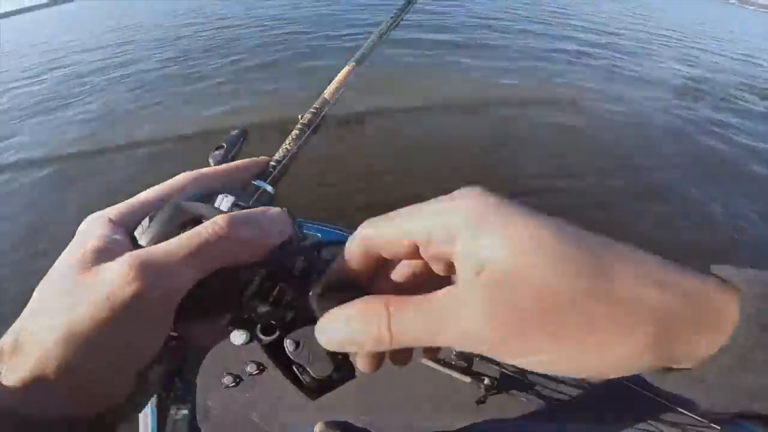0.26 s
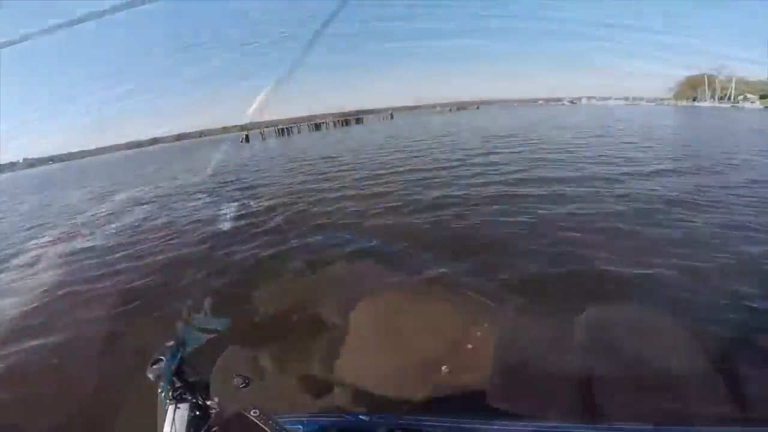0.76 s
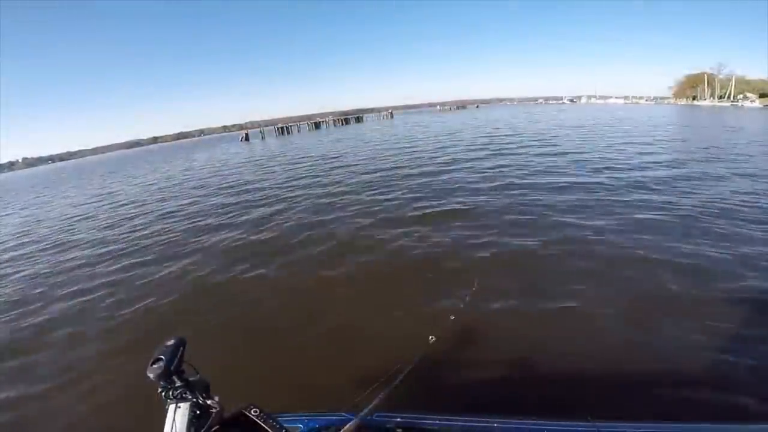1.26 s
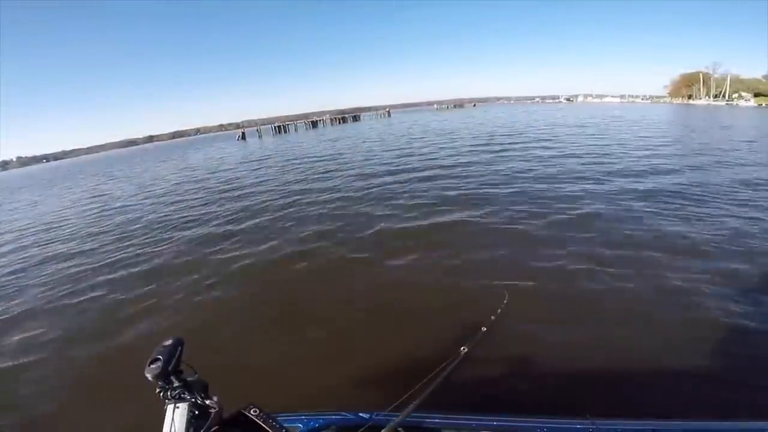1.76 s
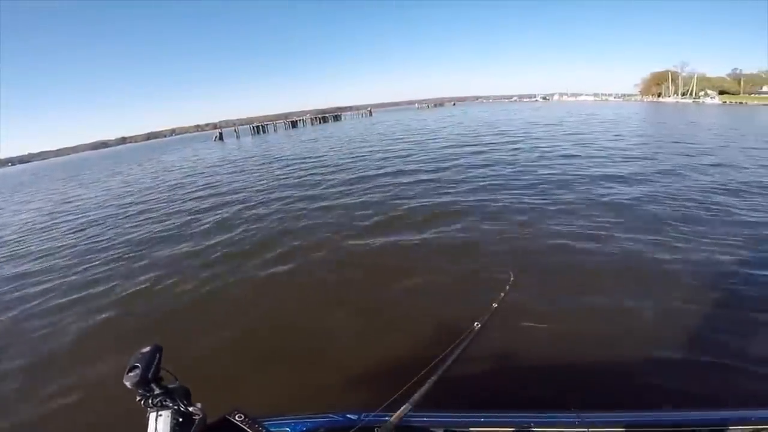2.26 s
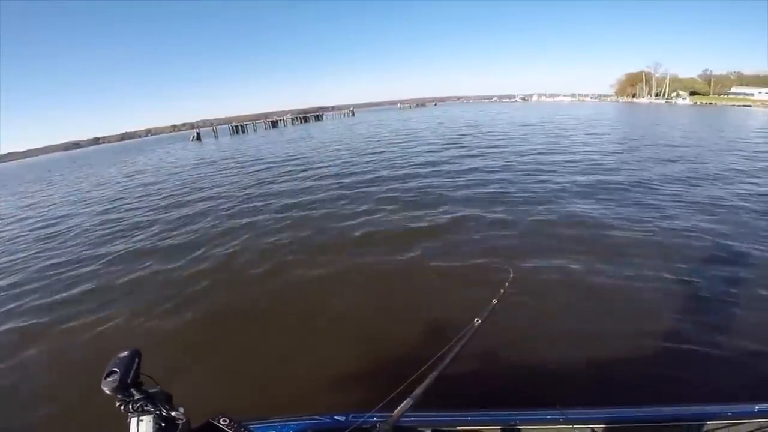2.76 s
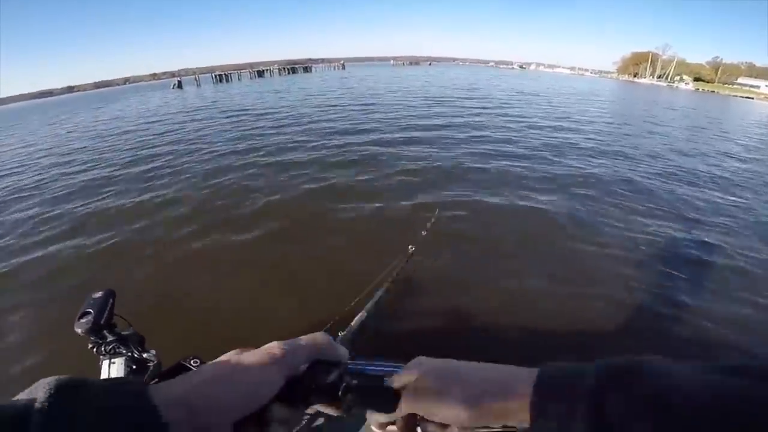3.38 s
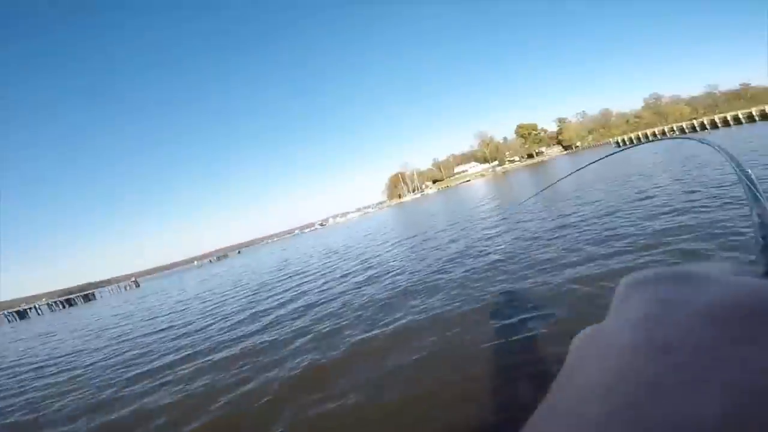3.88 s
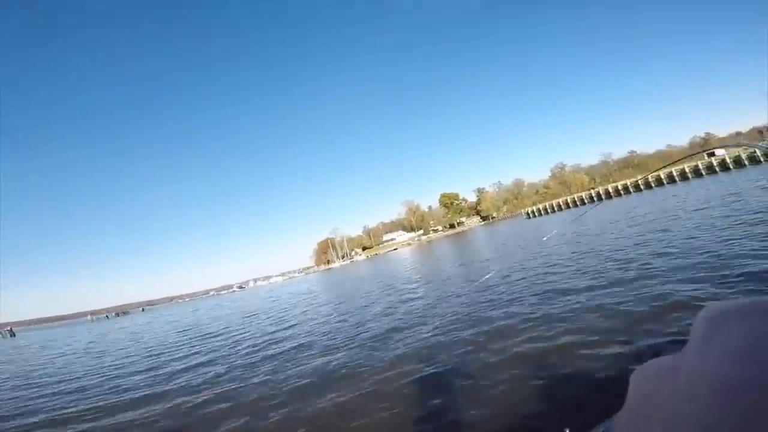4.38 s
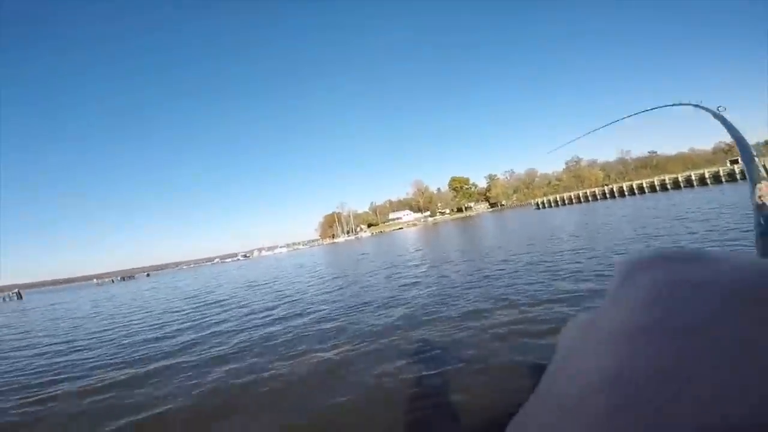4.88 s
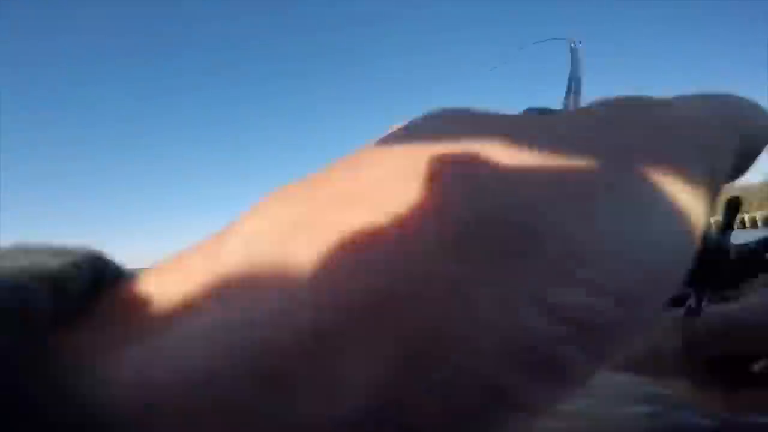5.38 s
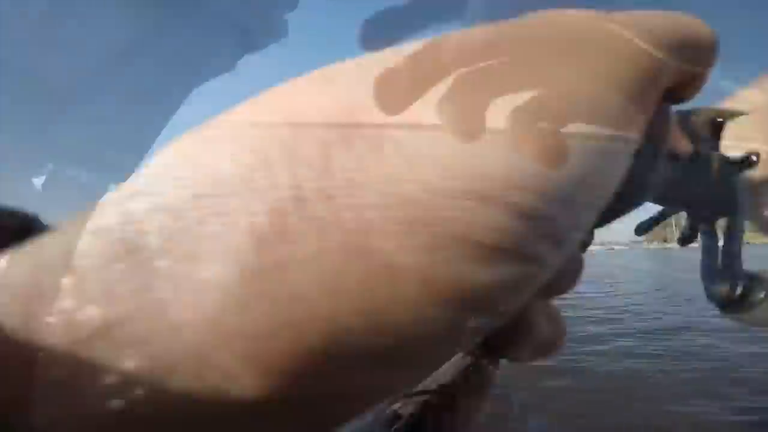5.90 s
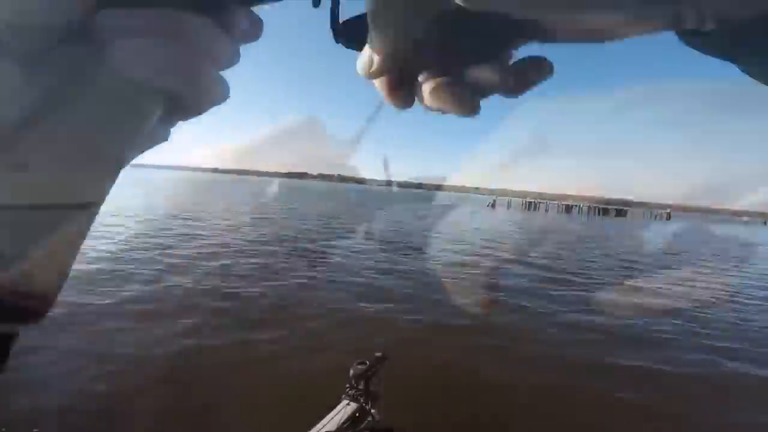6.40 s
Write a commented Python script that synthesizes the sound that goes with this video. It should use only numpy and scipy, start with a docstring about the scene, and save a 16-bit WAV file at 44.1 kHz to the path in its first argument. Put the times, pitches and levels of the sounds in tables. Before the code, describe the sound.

Slack line ticks softly into a hand-cranked reel, then mostly water lapping at the hull with small bubbles and a low breeze. A sudden rod sweep brings sleeve rustle, woody creaks and dull thumps. The boat rocks gently, then dry metallic ratchet bursts, bright snaps and gritty winding dominate, very near the microphone outdoors, with low wind buffeting.

```python
"""Slack line ticks lightly into a hand-cranked fishing reel, over wind and water lapping at a boat's hull.
The angler sweeps the rod back to set the hook: the sleeve swishes, the tackle creaks, the rod butt thumps.
Then line slips against the drag in spurts and the clicker rattles loudly while the winding goes on.
Clicks are noise bursts shaped by the reel's modes; rubbing, cloth, water and air are coloured noise;
thumps, jolts and bubbles are damped sines, and the gears whine in harmonics."""
import sys
import numpy as np
from scipy import signal
from scipy.fft import rfft, irfft, next_fast_len
from scipy.io import wavfile
from scipy.ndimage import uniform_filter1d

SR = 44100
rng = np.random.default_rng(int(sys.argv[2]) if len(sys.argv) > 2 else 0)


def transcribe(signal):
    """Save signal, clipped to [-1, 1], as a 16-bit WAV file at the path in sys.argv[1]."""
    frames = np.atleast_2d(signal).T
    limited = np.clip(frames, -1, 1)
    pcm = np.round(limited * 32767).astype(np.int16)
    wavfile.write(sys.argv[1], SR, pcm)


N = 293165
TIME = np.arange(N) / SR
EDGE_HZ = 15500  # upper limit of the band
# times at which the reel is held out, raised and overhead: [t/s]
POSE_TIMES = [3.92, 6.23, 6.92]


def amp(db):
    """Amplitude ratio: 20 dB is a factor of ten."""
    return 10 ** (np.asarray(db) / 20)


def unit(x):
    """Normalization to unit rms."""
    return x / np.sqrt(np.mean(x ** 2) + 1e-20)


def follow(rows):
    """Envelope interpolated in decibels along rows (t/s, level/dB), decaying exponentially outside them."""
    s, db = np.transpose(rows)
    outside = np.maximum(np.maximum(s[0] - TIME, TIME - s[-1]), 0)
    return amp(np.interp(TIME, s, db)) * np.exp(-outside / 0.019)


def swells(rows):
    """Incoherent sum of Gaussian envelopes, rows (peak t/s, rise/s, fall/s, level/dB): powers add."""
    edge_db = 7.5  # loss one rise before the peak or one fall after it
    power = np.zeros(N)
    for s, rise, fall, db in rows:
        away = (TIME - s) / np.where(TIME < s, rise, fall)
        power += amp(db - edge_db * np.minimum(away ** 2, 20)) ** 2
    return np.sqrt(power)


def add(mix, s, sound):
    """Linear superposition of a sound starting at time s."""
    part = mix[max(round(s * SR), 0):][:len(sound)]
    part += sound[:len(part)]


def colour(x, spectrum):
    """Linear filtering by a gain curve of rows (f/Hz, level/dB), interpolated in log frequency, to rms 1."""
    hz, db = np.transpose(spectrum)
    size = next_fast_len(N)
    gain = amp(np.interp(np.log(np.fft.rfftfreq(size, 1 / SR) + 1), np.log(hz), db))
    return unit(irfft(rfft(x, size) * gain, size)[:N])


def drift(hz):
    """Random fluctuation: Gaussian low-pass noise of unit rms."""
    lowpass = np.exp(-(np.fft.rfftfreq(N, 1 / SR) / hz) ** 2)
    return unit(irfft(rfft(rng.standard_normal(N)) * lowpass, N))


def rings(rows, glide, attack, size=8000):
    """Damped oscillation, rows (t/s, level/dB, initial f/Hz, decay/s); the pitch glides as it dies."""
    out, t = np.zeros(N), np.arange(size) / SR
    for s, db, hz, decay in rows:
        pitch = hz * (1 + glide * (1 - np.exp(-t / decay / 2)))
        turns = np.cumsum(pitch) / SR
        envelope = np.exp(-t / decay) * (1 - np.exp(-t / attack))
        add(out, s, amp(db) * np.sin(2 * np.pi * turns) * envelope)
    return out


def grains(per_s, spread_db, decay, size=400):
    """Poisson-like impacts of very uneven size, each an exponentially decaying noise burst."""
    sizes = amp(spread_db * np.minimum(rng.exponential(1, N), 3))
    hits = (rng.random(N) < per_s / SR) * sizes
    envelope = np.convolve(hits, np.exp(-np.arange(size) / SR / decay))[:N]
    return envelope * rng.standard_normal(N)


def clicker(uneven=.1, vary_db=2.0, bright_vary_db=3.5):
    """Ratchet kinematics: one pawl drop per tooth, giving rows (t/s, level/dB, brightness/dB)."""
    # spurts of line slipping against the drag:
    # [t/s, length/s, teeth passed, level/dB, brightness/dB, lean (+ gathers speed, - runs down)]
    spurts = [(4.674, .0165, 3, -9.5, -1, .2), (4.715, .026, 3, -9.5, 3, 0), (4.820, .010, 2, -10, .5, 0),
              (4.871, .0095, 2, -11, .5, 0), (4.908, .009, 2, -11, -1.5, 0),
              (4.9305, .0613, 13, -12.5, -5, -.17), (5.0086, .019, 3, -15.5, 0, 0),
              (5.084, .010, 2, -13.5, 0, 0), (5.1205, .0077, 2, -12, -1, 0),
              (5.1455, .065, 14, -12.5, -2, -.29), (5.232, .010, 2, -17, 2, 0), (5.295, 0, 1, -9.5, 1, 0),
              (5.3777, .0227, 5, -13, 0, -.2), (5.519, .094, 16, -13.5, 1.5, 0),
              (5.716, .0637, 12, -12.5, 1.5, .4), (5.7997, .0093, 2, -16, 1.5, 0),
              (5.8344, 0, 1, -13.5, -2, 0), (5.8573, .013, 3, -14, 0, -.25), (5.891, .017, 7, -15, 1.5, .3),
              (5.914, .052, 22, -14.5, 2.5, 0), (5.9694, .016, 3, -21.5, 2, -.3),
              (6.078, .062, 11, -19.5, 0, .55), (6.160, 0, 1, -21, -2, 0), (6.237, .0167, 3, -23, -3, -.45),
              (6.266, .0454, 9, -21.5, -2, 0), (6.352, .0196, 3, -11, -3, 0),
              (6.3956, .0135, 3, -13, 1, -.45), (6.5543, .011, 2, -10.5, -2, 0),
              (6.5914, .0207, 4, -12, -3, 0), (6.6343, .0055, 2, -12, 1, 0)]
    surge = .26  # shortening of the tooth interval in mid-spurt, as a share of the mean
    bite_db, first_db = 0.5, -2.5  # mid-spurt level above the ends; change for the slow first tooth
    clicks = []
    for s, length, teeth, db, bright_db, lean in spurts:
        turned = np.linspace(0, 1, max(round(teeth), 1))
        late, harder, sharper = rng.standard_normal((len(turned), 3)).T
        arch = np.sin(np.pi * turned)
        at = turned + lean * turned * (1 - turned)
        at = at + surge * np.sin(2 * np.pi * turned) / (2 * np.pi)
        at = at + uneven * arch * late / len(turned)
        level = db + bite_db * (arch - arch.mean()) + first_db * (turned == 0) + vary_db * harder
        clicks.append(np.c_[s + length * at, level, bright_db + bright_vary_db * sharper])
    return np.concatenate(clicks)


def reel_body(s, bright_db, hz, vary_db=4.0, wander=0.013, valley_db=-23):
    """Modal radiation: a minimum-phase response whose modes each click excites a little differently."""
    # resonances of the reel as it nears the microphone:
    # [f/Hz, half-width/Hz at -8 dB, level/dB held out, level/dB raised, level/dB overhead]
    modes = [(402, 165, 6.5, -3, 1), (730, 208, 11.5, 3, -31), (1664, 570, 0.5, 2, -1.5),
             (2226, 680, -0.5, -2.5, -5.5), (2940, 620, 9.5, -7.5, -5), (3800, 290, -10, -8, -50),
             (5070, 1030, -7, -15, -40), (6110, 306, 12.5, -7, -3), (6700, 2800, -16, -8, -16.5),
             (8070, 600, -3, -1, -8), (9200, 50, -9, -14.5, -13), (9790, 1260, -0.5, -12, -20),
             (13100, 1500, -8, -17.5, -23), (14700, 1100, -7, -10, -28)]
    power = amp(valley_db) ** 2
    for (centre, width, *poses), (louder, higher) in zip(modes, rng.standard_normal((len(modes), 2))):
        gain = amp(np.interp(s, POSE_TIMES, poses) + vary_db * louder)
        detuning = (hz - centre * (1 + wander * higher)) / width
        power = power + gain ** 2 / (1 + detuning ** 2 * 1.51) ** 2
    bass_loss = hz ** 2 / (hz ** 2 + 260 ** 2)  # a small body radiates little bass
    tilt = amp(bright_db * .5 * np.tanh((hz - 4500) / 1800))  # a sharper click carries more treble
    gain = np.sqrt(power) * bass_loss * tilt / (1 + (hz / EDGE_HZ) ** 20)
    # the Hilbert transform of the log gain supplies the phase of a causal response
    log_gain = np.log(np.maximum(gain, 1e-3))
    return np.exp(np.conj(signal.hilbert(np.r_[log_gain, log_gain[-2:0:-1]]))[:len(hz)])


def click_radiation(clicks, size=4096):
    """Impact and multiple scattering: each drop rings the frame; nearby arms and rod scatter it."""
    rise, decay, tail_decay = 0.00085, 0.0013, 0.01  # s
    fresh, tail_db, tail_hz = 0.64, -13, 2600  # share of new paths; scatter level and low-pass corner
    lead = .0013  # s by which the burst starts ahead of the click time
    margin = size // 8 / SR  # room ahead of the burst for the filtering
    t, hz = np.maximum(np.arange(size) / SR - margin, 0), np.fft.rfftfreq(size, 1 / SR)
    out = np.zeros(N)
    burst = np.minimum(t / rise, 1) * np.exp(-np.maximum(t - rise, 0) / decay)
    scatter = (1 - np.exp(-t / rise)) ** 2 * np.exp(-t / tail_decay)
    # neighbouring clicks take nearly the same paths, which change as the hands move
    path_times = np.linspace(clicks[:, 0].min(), clicks[:, 0].max(), 10)
    paths = rng.standard_normal((len(path_times), 2, size))
    for s, db, bright_db in clicks:
        shared = unit(np.tensordot(np.exp(-((s - path_times) / 0.13) ** 2), paths, 1))
        z = rfft((shared + fresh * rng.standard_normal((2, size))) * [burst, scatter])
        # the paths smear time and leave the colour to the body
        z /= np.sqrt(uniform_filter1d(abs(z) ** 2, size=91, axis=1) + 1e-12)
        both = z[0] + amp(tail_db) * z[1] / (1 + 1j * hz / tail_hz)
        click = irfft(both * reel_body(s, bright_db, hz))
        shift = rng.uniform(-.00005, .00005)  # s of small random shift in each click's time
        energy = np.sum(click ** 2) / (0.0028 * SR)  # as if spread over 2.8 ms
        add(out, s + shift - lead - margin, amp(db) * click / np.sqrt(energy))
    return out


def jolts(clicks, hz=150, decay=0.0048, spread=0.498):
    """Structure-borne transmission: each click also travels down the arm as a small dull push."""
    # level of the push relative to its click in each pose: [level/dB]
    jolt_db = [-14, -12, -24]
    s, db, _ = np.transpose(clicks)
    pitch = hz * np.exp(spread * rng.standard_normal(len(s)))
    level = db + np.interp(s, POSE_TIMES, jolt_db)
    return rings(np.c_[s, level, pitch, np.full(len(s), decay)], glide=-0.79, attack=0.00075)


def gears(tooth_hz=165, grit_db=1.1, tooth_db=2):
    """Amplitude-modulated friction: meshing teeth rub in quick uneven pulses, as hard as the hand winds."""
    # pushes on the handle, one list per spell of winding: [peak t/s, rise/s, fall/s, level/dB]
    winding = [
        [(0.34, .36, .34, -54.5), (.73, .05, .08, -63)],
        [(3.32, 0.18, 0.18, -48.5)],
        [(4.28, 0.082, 0.033, -50.5), (4.49, 0.086, 0.066, -51)],
        [(4.92, 0.21, 0.36, -41), (5.25, 0.34, 0.28, -42.5), (5.45, 0.21, 0.065, -37.5), (5.75, 0.16, .24, -36),
         (6.36, .15, 0.11, -36.5), (6.56, 0.06, .15, -37.5)],
    ]
    # relative spectrum of the gears' whirr in each spell: [f/Hz, level/dB]
    whirrs = [
        [(200, -23), (600, 4), (1400, 1.5), (2200, -4.5), (2900, -15), (5000, -21), (9500, -19.5), (12000, -29),
         (15000, -26)],
        [(400, -1), (1300, -11), (2150, -0.5), (3000, -12.5), (4000, -20.5), (4600, -19), (5800, -19),
         (7500, -23), (8200, -21), (8900, -26), (9900, -16.5), (11200, -33), (15000, -30)],
        [(300, 6), (900, 4), (1700, -2), (3000, -2), (4000, -18), (5800, -11), (6600, -19), (9500, -17),
         (11000, -29), (15000, -26)],
        [(300, 0), (700, -0.5), (1100, 0), (1850, 1), (2600, -2.5), (4200, -14), (6100, -13.5), (7000, -20),
         (9000, -13), (10500, -22), (12500, -28), (14500, -21)],
    ]
    passed = np.cumsum(tooth_hz * (1 + .15 * drift(7.67))) / SR
    teeth = .28 + np.exp(-(passed % 1) / .25)
    worn = rng.standard_normal(N)[np.abs(passed).astype(int)]  # no two teeth bite alike
    rub = rng.standard_normal(N) * teeth * amp(tooth_db * worn + grit_db * drift(250))
    return sum(colour(rub, whirr) * swells(pushes) for whirr, pushes in zip(whirrs, winding))


def gear_whine(waver=0.0149, count=8):
    """Harmonic synthesis: harmonics 2 to 7 of the tooth mesh arch with the speed of the handle."""
    # one quick turn of the handle: [t/s, mesh f/Hz, level/dB]
    quick_turn = [(4.21, 399, -74), (4.245, 457, -60), (4.28, 494, -60), (4.305, 475, -63),
                  (4.33, 410, -77)]
    s, hz, db = np.transpose(quick_turn)
    turns = np.cumsum(np.interp(TIME, s, hz) * (1 + waver * drift(164))) / SR
    mesh = sum(np.sin(2 * np.pi * k * turns) for k in range(2, count))
    return unit(mesh) * follow(np.c_[s, db])


def spool(waver=.035, width_hz=300):
    """Friction-driven resonance: narrow-band noise on a wavering carrier, the loaded spool singing."""
    # resonance of the spool under load: [t/s, f/Hz, level/dB]
    singing = [(5.278, 2050, -56), (5.42, 1834, -42.5), (5.66, 1850, -43), (6.031, 1817, -49),
               (6.2, 1826, -48), (6.33, 1965, -43), (6.459, 1826, -40), (6.65, 1758, -45)]
    s, hz, db = np.transpose(singing)
    pitch = np.interp(TIME, s, hz) * (1 + waver * drift(20.96))
    carrier = np.exp(2j * np.pi * np.cumsum(pitch) / SR)
    rubbing = drift(width_hz) + 1j * drift(width_hz)
    return unit((carrier * rubbing).real) * follow(np.c_[s, db])


def slack_ticks(ticks_per_s=105, decay=0.00063, size=300):
    """Impulsive excitation: light ticks ring the high resonances of the reel as slack comes in."""
    # swells of the ticking, as gain: [peak t/s, rise/s, fall/s, level/dB]
    ticking = [(.13, 0.26, 0.04, -51.5), (.22, 0.036, 0.036, -46.5), (.35, .08, .085, -45),
               (.57, 0.071, 0.16, -54)]
    out, t = np.zeros(N), np.arange(size) / SR
    teeth = np.cumsum(ticks_per_s * (1 + 0.09 * drift(8))) / SR
    for s in TIME[1:][np.diff(np.floor(teeth)) > 0]:
        tick = rng.standard_normal(size) * np.exp(-t / decay)
        add(out, s, amp(2 * rng.standard_normal()) * tick)
    modes = [(3770, 420, 6.4), (6070, 290, 13.7), (7900, 260, 7.0)]  # f/Hz, width/Hz, gain/dB
    rung = sum(amp(db) * signal.lfilter(*signal.iirpeak(hz, hz / width, SR), out)
               for hz, width, db in modes)
    return rung * swells(ticking)


def line_crackle():
    """Stick-slip: tight turns of line slip over each other in sparse bursts."""
    # line wound on tight: [peak t/s, rise/s, fall/s, level/dB]
    strain = [(4.79, .025, .04, -54), (5.46, 0.081, .12, -42.5), (5.78, 0.12, 0.14, -41),
              (6.1, 0.14, 0.098, -51.5), (6.58, .08, 0.18, -44.5)]
    # relative spectrum of the crackle: [f/Hz, level/dB]
    crackle = [(1000, -10), (3000, -12), (6000, -5), (9000, 1), (11300, 1), (12700, -11), (14500, 3),
               (16000, -9)]
    slips = grains(per_s=240, spread_db=3.5, decay=0.0012)
    return colour(slips, crackle) * swells(strain)


def sleeve(grain_db=4):
    """Sliding friction: randomly modulated noise, the cloth catching and sliding during the sweep."""
    # strokes of the sleeve: [peak t/s, rise/s, fall/s, level/dB]
    strokes = [(3.63, 0.045, 0.036, -42.5), (3.70, .02, 0.035, -30.5), (3.81, 0.067, 0.045, -46.5),
               (3.99, 0.044, 0.063, -60)]
    # relative spectrum of the cloth: [f/Hz, level/dB]
    cloth = [(300, 13.5), (900, 5), (1500, 1), (2200, 6.5), (2800, -1), (3600, -6), (5000, -9), (6100, -12),
             (7000, -11), (8000, -3), (9200, 2), (10300, -14), (12500, -21), (14400, -15)]
    return colour(rng.standard_normal(N) * amp(grain_db * drift(230)), cloth) * swells(strokes)


def creaks(snap_trim_db=-6, sharpness=7, snap_hz=9500, decay=.0008, size=900):
    """Stick-slip: each short slip of the loaded tackle gives a snap and a damped resonance."""
    # creaks and ticks: [t/s, ring peak level/dB, f/Hz, snap level/dB re ring before the trim]
    slips = [(.732, -49, 4240, -2), (1.999, -47, 2600, -16), (3.406, -35, 5100, -25),
             (3.623, -23, 2120, -18), (3.633, -31.5, 3700, -10), (3.651, -22.5, 1980, -28),
             (3.688, -21, 13000, -8), (3.695, -12.5, 3620, -11), (3.702, -16, 2330, -5),
             (3.711, -19, 1830, -26), (3.715, -19, 2010, -29), (3.726, -20, 2500, -22),
             (3.784, -36.5, 2880, 6), (3.815, -27, 2480, 2.5), (4.501, -38.5, 8200, 12),
             (4.619, -45, 6000, 11), (5.266, -16, 11800, 0), (5.4255, -19, 11800, 5),
             (5.463, -21, 12400, -11), (5.644, -10.5, 10200, -9), (5.824, -20, 10930, 5)]
    out, t = np.zeros(N), np.arange(size) / SR
    for s, db, hz, snap_db in slips:
        slip = rng.standard_normal(size) * np.exp(-t / decay)
        ring = signal.lfilter(*signal.iirpeak(hz, sharpness, SR), slip)
        snap = signal.lfilter(*signal.butter(2, snap_hz, fs=SR), slip)
        snap_gain = amp(snap_db + snap_trim_db)
        add(out, s, amp(db) * (ring / abs(ring).max() + snap_gain * snap / abs(snap).max()))
    return out


def thumps():
    """Damped free vibration: blows through the rod and the body, sinking slightly in pitch."""
    # blows: [t/s, level/dB before damping, initial f/Hz, decay/s]
    blows = [(.134, -18, 260, 0.0018), (.140, -19.5, 107, 0.015), (2.012, -27.5, 132, 0.013),
             (2.18, -28, 129, 0.018), (3.553, -32.5, 197, 0.023), (3.694, -10, 78.5, 0.0073),
             (3.726, -7.5, 120, 0.0029), (3.8125, -5.5, 605, 0.00098), (3.814, -18, 200, 0.0097),
             (3.818, -9, 74, 0.0051), (4.075, -33.5, 135.3, 0.016), (4.831, -19.5, 106, .012)]
    return rings(blows, glide=-0.038, attack=0.0004)


def water(wash_db=6.0, swell_db=3.0, ripple_db=-59, hiss_db=-73, count=220):
    """Turbulence and bubble resonance: waves wash the hull and shed bubbles, over a faint even hiss."""
    # relative spectrum of the wash: [f/Hz, level/dB]
    wash_spectrum = [(53, -14), (90, -7.5), (132, -3.5), (221, -8.5), (292, -6.5), (420, -9), (488, -14),
                     (645, -17), (948, -25.5), (1550, -35), (1690, -36), (3980, -43.5), (15000, -48)]
    # course of the lapping before the wash gain: [t/s, level/dB]
    lapping = [(0, -48), (.64, -57.5), (1.14, -55), (2.15, -54), (3.05, -52), (3.8, -57), (4.6, -58.5),
               (5.9, -49.5)]
    # slosh as the boat rocks after the sweep: [peak t/s, rise/s, fall/s, level/dB]
    rocking = [(3.91, 0.4, 0.19, -50.5), (4.32, 0.33, 0.81, -52.5)]
    # relative spectrum of the slosh: [f/Hz, level/dB]
    slosh_spectrum = [(200, -13), (450, 7), (900, 2), (1500, -8.5), (2500, -14.5), (5000, -23),
                      (12000, -31)]
    # two faint high squeaks, then the louder drips and bubbles at the hull:
    # [t/s, level/dB before damping, initial f/Hz, decay/s]
    squeaks_and_drips = [(1.015, -57, 4670, .0041), (1.055, -58, 3650, .0044), (1.113, -45, 1540, 0.0024),
                         (1.999, -43.5, 1740, 0.0039), (2.168, -37.5, 894, .0038), (2.237, -37, 477, 0.03),
                         (2.72, -38.5, 281, 0.032), (2.955, -44.5, 1350, 0.0044),
                         (3.889, -37.5, 1400, 0.003), (4.238, -37.5, 380, 0.018)]
    low = signal.lfilter(*signal.butter(2, 900, fs=SR), rng.standard_normal(N))
    waves = rng.standard_normal(N) + .5 * low * amp(swell_db * drift(10))
    wash = colour(waves, wash_spectrum) * follow(lapping)
    slosh = colour(rng.standard_normal(N) * amp(3.5 * drift(40)), slosh_spectrum) * swells(rocking)
    when, size, pitch = rng.random((count, 3)).T
    hz = 450 * 7 ** pitch
    # higher bubbles tend to be weaker and die sooner
    ripples = np.c_[when * TIME[-1], ripple_db + 13 * size ** 2 - 11 * pitch, hz, 5 / hz]
    bubbles = rings(ripples, glide=0.2, attack=0.0006)
    drips = rings(squeaks_and_drips, glide=0.073, attack=0.00012)
    return amp(wash_db) * wash + slosh + bubbles + drips + amp(hiss_db) * rng.standard_normal(N)


def spatter(level_db=-69):
    """Random impacts: ripples break against the hull in faint ticks."""
    # relative spectrum of the ticks: [f/Hz, level/dB]
    tick_spectrum = [(300, 2), (900, -14.5), (1700, -3), (2800, -14), (5000, -23), (14000, -40)]
    ticks = grains(per_s=24, spread_db=2.2, decay=.0025)
    return amp(level_db) * colour(ticks, tick_spectrum)


def wind(deep_from_db=-33):
    """Turbulent pressure: light air buffets the microphone, more deeply in strong pushes."""
    # relative spectrum of the light air: [f/Hz, level/dB]
    air = [(8, 4.5), (25, 1), (40, -6.5), (70, -6.5), (120, -21), (250, -28), (600, -65), (2000, -100)]
    # deep buffeting as the body moves, with a dull rubbing near 130 Hz: [f/Hz, level/dB]
    movement = [(6, -2.5), (18, -0.5), (28, 0.5), (45, -18), (70, -29), (130, -21.5), (300, -47.5),
                (2000, -110)]
    # swells of the buffeting, by gusts and as the angler moves: [peak t/s, rise/s, fall/s, level/dB]
    puffs = [(.08, .2, .25, -34), (1.08, .04, .06, -34), (2.16, .03, .04, -35), (3.11, .06, .1, -37),
             (3.61, .04, .03, -23), (3.72, .025, .04, -14.5), (3.81, .04, .06, -25), (4.15, .25, .2, -36),
             (4.95, .25, .5, -24), (5.8, .35, .22, -25), (6.5, .4, .5, -37)]
    breeze_db, gustiness_db, gust_hz = -39.5, 4, 1.3  # level, variation and its speed
    buffets = np.array([colour(rng.standard_normal(N), spectrum) for spectrum in (air, movement)])
    # even out the buffets so that the push sets the level
    light, deep = buffets / np.sqrt(uniform_filter1d(buffets ** 2, size=6000, axis=1) + 0.022)
    push = np.hypot(amp(breeze_db + gustiness_db * drift(gust_hz)), swells(puffs))
    share = 1 / (1 + (push / amp(deep_from_db)) ** 2)  # power share of the light air
    return push * (np.sqrt(share) * light + np.sqrt(1 - share) * deep)


def scene():
    """Superposition of reel, angler, water and wind at one microphone in open air."""
    clicks = clicker()
    reel = click_radiation(clicks) + jolts(clicks)
    reel = reel + gears() + gear_whine() + spool() + slack_ticks() + line_crackle()
    angler = sleeve() + creaks() + thumps()
    return (reel + angler + water() + spatter() + wind())[None]


def record(dry):
    """Saturation and band limitation: peaks are rounded off near full scale, then low-passed."""
    edge = signal.firwin(201, EDGE_HZ, window=("kaiser", 8), fs=SR)
    rounded = dry / (1 + (dry / .92) ** 6) ** (1 / 6)
    return signal.oaconvolve(rounded, edge[None], "same")


dry = scene()
out = record(dry)
transcribe(out)
```